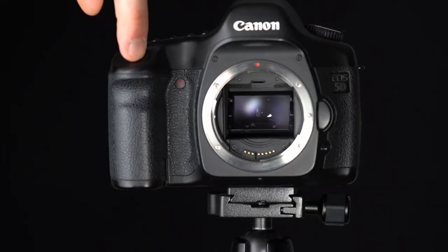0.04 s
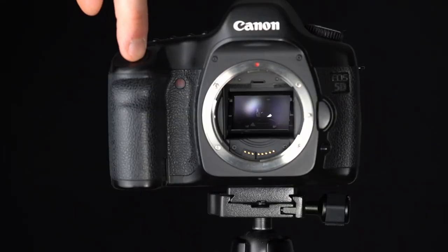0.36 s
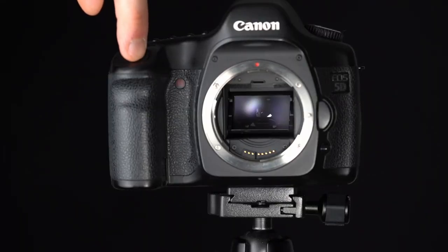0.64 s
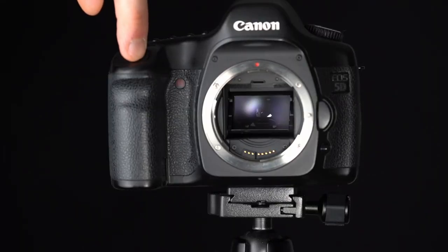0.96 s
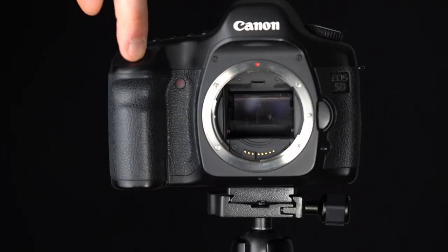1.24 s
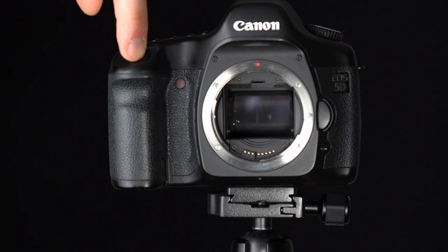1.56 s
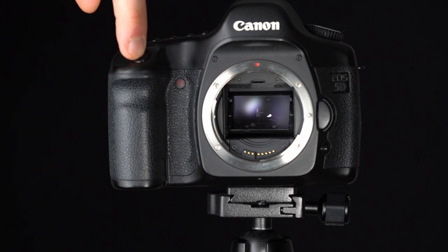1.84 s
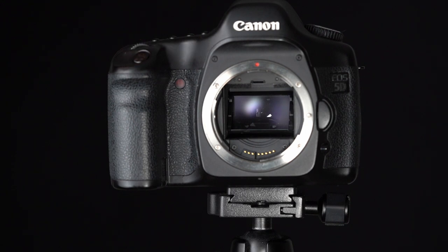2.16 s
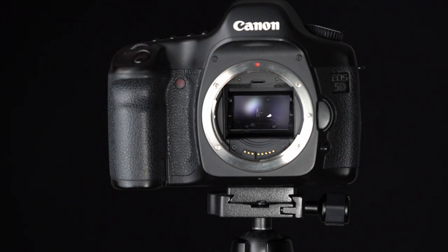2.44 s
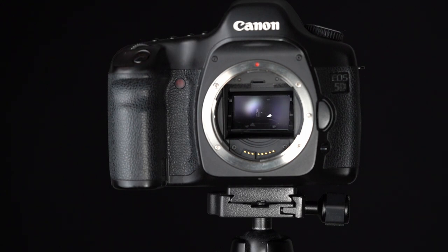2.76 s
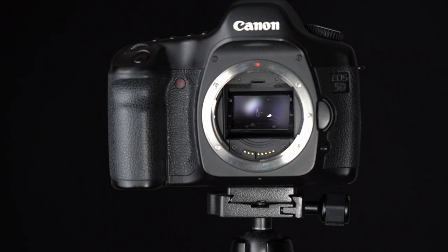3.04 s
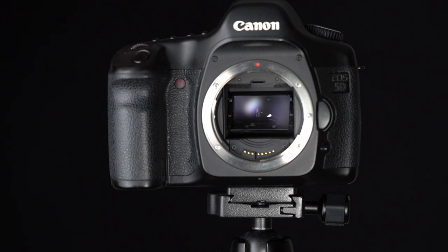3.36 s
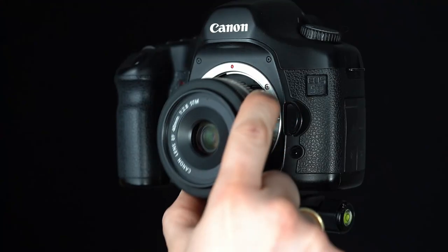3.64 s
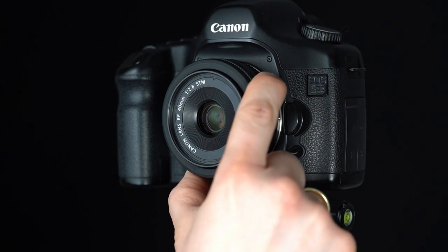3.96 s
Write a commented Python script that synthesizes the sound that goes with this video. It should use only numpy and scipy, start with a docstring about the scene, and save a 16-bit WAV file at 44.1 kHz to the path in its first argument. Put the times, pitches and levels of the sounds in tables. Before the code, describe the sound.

Close to the microphone, a camera shutter fires a steady burst of crisp, rattling clacks that ring through the room over a low throb. Only faint hum remains, until a lens is attached with a soft knock, scrape and click.

```python
"""Crisp clacks, three a second, ring through a reverberant room: a reflex camera is already mid-burst.
In each frame the mirror is released and hits its stop, the shutter curtains zing and stop, the mirror
slaps back and rattles, and a latch ticks; the body rings and the tripod sways with a low throb.
After a pause with only mains hum and faint air, a lens knocks onto the mount, scrapes round and seats.
Every click is a burst of micro-impacts, coloured by the part that is hit."""
import sys
import numpy as np
from scipy import signal
from scipy.fft import rfft, irfft, next_fast_len
from scipy.io import wavfile
from scipy.ndimage import uniform_filter1d, minimum_filter1d

SR = 44100
rng = np.random.default_rng(int(sys.argv[2]) if len(sys.argv) > 2 else 0)


def inscribe(sig):
    """Save sig as 16-bit PCM at rate SR to the path in sys.argv[1].

    A 1-D sig is mono; a 2-D sig holds one channel per row.
    Samples are clipped to [-1, 1] before scaling.
    """
    pcm = np.round(np.clip(np.atleast_2d(sig).T, -1, 1) * 32767)
    wavfile.write(sys.argv[1], SR, pcm.astype(np.int16))


N = 176400


def amp(db):
    """Decibels to gain."""
    return 10 ** (np.asarray(db) / 20)


def unit(x):
    """Scale to rms 1."""
    return x / np.sqrt(np.mean(x ** 2) + 1e-20)


def along(points, hz):
    """Read a curve of (frequency, value) points on a log axis."""
    f, v = np.transpose(points)
    return np.interp(np.log(hz + 1), np.log(f + 1), v)


def add(track, s, sound):
    """Mix a sound into the track at s seconds."""
    start = round(s * SR)
    sound = sound[max(-start, 0):max(len(track) - start, 0)]
    track[max(start, 0):][:len(sound)] += sound


def noise(size=8192):
    """White noise."""
    return rng.standard_normal(size)


def coloured(x, eq):
    """Shape a signal with an EQ curve, at rms 1."""
    hz = np.fft.rfftfreq(len(x), 1 / SR)
    return unit(irfft(rfft(x) * amp(along(eq, hz)), len(x)))


def swell(t, attack, t60):
    """Envelope: rounded attack, exponential decay."""
    return (1 - np.exp(-t / max(attack, 1e-5))) * amp(-60 * t / t60)


def contact(grain, eq, db, attack, t60):
    """One hit: a burst of micro-impacts rings with the colour of its part; db sets its energy."""
    n = len(grain)
    burst = rfft(grain * swell(np.arange(n) / SR, attack, t60))
    hz = np.fft.rfftfreq(n, 1 / SR)
    grain_colour = np.sqrt(abs(uniform_filter1d(abs(burst) ** 2, size=36)) + 1e-12)
    low_cut = (hz + 1) / (hz + 150)
    gain = amp(along(eq, hz)) * low_cut / grain_colour
    # minimum phase keeps the attack sharp: all ringing follows the hit
    cepstrum = irfft(np.log(gain + 1e-9))
    cepstrum[1:n // 2] *= 2
    cepstrum[n // 2 + 1:] = 0
    hit = irfft(burst * np.exp(rfft(cepstrum)))
    return amp(db) * np.sqrt(SR / n) * unit(hit)


def ringing(x, modes):
    """A blow as it leaves a solid part: the blow itself plus the part's ringing modes."""
    t = np.arange(SR // 2) / SR
    ring = np.zeros(len(t))
    for hz, db, t60 in modes:
        scale = 2 * np.log(1000) / (t60 * SR)  # puts the resonant peak at db
        ring += scale * amp(db - 60 * t / t60) * np.cos(2 * np.pi * hz * t)
    return x + signal.fftconvolve(x, ring)[:len(x)]


# reverb decay: f/Hz, t60/s
REVERB_DECAY = [(300, 0.72), (800, 0.57), (2000, 0.61), (3200, 0.64), (4200, 0.59), (6000, 0.57),
                (14000, 0.32)]
# reverb colour: f/Hz, level/dB
REVERB_EQ = [(250, 4.5), (800, 2.5), (1800, 4), (3100, -3.5), (3700, -2), (4400, 0), (7000, -5),
             (14000, 3.5)]
def room(x, wet_db):
    """A diffuse tail that blooms in about 10 ms and loses its treble first."""
    hz, t, spectra = signal.stft(noise(SR), SR, nperseg=256)
    tail_db = along(REVERB_EQ, hz)[:, None] - 60 * t / along(REVERB_DECAY, hz)[:, None]
    tail = signal.istft(spectra * amp(tail_db), SR, nperseg=256)[1]
    tail *= 1 - np.exp(-(np.arange(len(tail)) / SR / .01) ** 2)
    return amp(wet_db) * signal.fftconvolve(x, tail / np.linalg.norm(tail))[:len(x)]


# frame cues, each at the mirror's slap: t/s, lever knock level/dB
FRAME_CUES = [(-.0335, -47.5), (0.2968, -45.5), (0.6271, -48), (0.9574, -50), (1.2878, -52),
              (1.6186, -45.5)]
PREROLL_S = 1
def every_frame(hits, eq, vary=.65):
    """Repeat a part's hits, timed from each cue; vary mixes fresh grain into each repeat."""
    track = np.zeros(PREROLL_S * SR + N)
    for offset, db, attack, t60 in hits:
        grain = noise()
        for s, _ in FRAME_CUES:
            add(track, PREROLL_S + s + offset, contact(grain + vary * noise(), eq, db, attack, t60))
    return track


# midrange knock of the lever: f/Hz, level/dB
LEVER_EQ = [(250, -35.5), (900, -14), (1500, -1), (2200, 2), (2700, -14), (15000, -35.5)]
def lever_knock():
    """The release lever knocks 109 ms ahead of each slap, its weight changing from frame to frame."""
    track = np.zeros(PREROLL_S * SR + N)
    for s, db in FRAME_CUES:
        add(track, PREROLL_S + s - .109, contact(noise(), LEVER_EQ, db, attack=.0016, t60=.051))
    return track


# release clicks: t/s, level/dB, attack/s, t60/s
RELEASE_HITS = [(-.109, -42.5, 0.0011, .016), (-.104, -45.5, 0.0011, 0.049)]
# their bright colour: f/Hz, level/dB
RELEASE_EQ = [(150, -39), (280, -19), (700, -14), (950, 2), (1200, -11.5), (1500, -5), (2400, -5.5),
              (3600, 1.5), (4170, -4), (6000, -6.5), (8300, -4), (9560, -9), (11400, -7.5), (15500, -15.5)]
def mirror_release():
    """The mirror is let go with a double click."""
    return every_frame(RELEASE_HITS, RELEASE_EQ, vary=1.5)


# mirror on its upper stop: t/s, level/dB, attack/s, t60/s
LIFT_HITS = [(-.0857, -40.5, 0.00017, 0.0062), (-.083, -48, 0.0012, 0.086)]
# its metallic colour: f/Hz, level/dB
LIFT_EQ = [(200, -31), (350, -9), (700, -4), (980, -6), (1300, -16), (2210, -11), (2850, 4), (3190, -9.5),
           (3650, 2.5), (4350, -7.5), (5420, -2), (6100, -11), (6850, 1), (7200, -8), (7700, 1.5),
           (8700, -11), (15500, -15.5)]
def mirror_lift():
    """The rising mirror hits its stop: a hard snap with a softer tail."""
    return every_frame(LIFT_HITS, LIFT_EQ)


# curtain zing, shutter clack, curtain stop: t/s, level/dB, attack/s, t60/s
ZING_HITS = [(-.0545, -48.5, 0.0008, .018), (-.0490, -46.5, 0.0012, .016), (-.027, -50.5, .003, .03)]
CLACK_HITS = [(-.0442, -39, .0012, 0.024), (-.0395, -45, .001, 0.022), (-.036, -53.5, .004, .08)]
STOP_HITS = [(-.0172, -46.5, .0012, .009)]
# their colours, peaky, full and thin: f/Hz, level/dB
ZING_EQ = [(300, -31.5), (1900, -11.5), (2400, 5), (3100, -8.5), (4400, -12.5), (5800, -9.5), (6350, 2.5),
           (7800, -13.5), (8600, -0.5), (9500, -17.5), (15500, -13)]
CLACK_EQ = [(150, -25), (736, -8), (948, -3), (1170, -12), (1450, -2.5), (1700, -9.5), (2450, -9.5),
            (3160, -11), (3910, -7.5), (4220, -12.5), (5030, 0), (5990, -8), (6700, -2.5), (9180, -14),
            (10500, -6), (15500, -15.5)]
STOP_EQ = [(400, -26.5), (2400, 1), (2900, -13.5), (7600, -13), (8900, 3.5), (9800, -7), (15500, -6.5)]
def shutter():
    """The curtains zing across around the shutter's clack, then stop with a tick."""
    zing = every_frame(ZING_HITS, ZING_EQ)
    clack = every_frame(CLACK_HITS, CLACK_EQ)
    return zing + clack + every_frame(STOP_HITS, STOP_EQ)


# the mirror's slap and rattle: t/s, level/dB, attack/s, t60/s
SLAP_HITS = [(0, -29.5, .001, .007), (.005, -42, 0.0015, 0.02)]
RATTLE_HITS = [(.020, -38, .002, 0.026), (.0232, -42.5, .001, 0.014), (.031, -49, .001, .03)]
# their hard, bright colours: f/Hz, level/dB
SLAP_EQ = [(120, -41.5), (290, -27.5), (380, -14), (550, -7), (980, -4), (1120, -19), (1600, -12.5),
           (2000, -14.5), (2850, -2.5), (3250, -4.5), (3680, 1), (4500, -11), (5200, -3), (6000, -12),
           (6700, -3), (7600, -12.5), (11000, -9), (15500, -17.5)]
RATTLE_EQ = [(170, -43.5), (330, -17), (560, -9), (970, -0.5), (1080, -13), (1500, -6.5), (2400, -15.5),
             (2910, 0), (3190, -7.5), (3600, 0), (4000, -9), (5040, -6), (5940, -11), (6850, -5),
             (7830, -8), (13800, -13.5), (15500, -20.5)]
def mirror_return():
    """The mirror slaps back, the main accent of each frame, and rattles to rest."""
    return every_frame(SLAP_HITS, SLAP_EQ) + every_frame(RATTLE_HITS, RATTLE_EQ)


# latch tick: t/s, level/dB, attack/s, t60/s
LATCH_HITS = [(.130, -50, 0.0027, .045)]
# its broad midrange: f/Hz, level/dB
LATCH_EQ = [(250, -17.5), (600, -16.5), (1000, 2), (1300, -1), (4000, -2.5), (15000, -20.5)]
def latch():
    """A latch closes each frame with a soft tick."""
    return every_frame(LATCH_HITS, LATCH_EQ, vary=1.5)


# ring of the body and its springs: f/Hz, level/dB, t60/s
BODY_MODES = [(564, -4, .2), (762, -2, .24), (797, -9, .22), (980, -2.5, .24), (2966, -6, .16),
              (3004, -8, 1.3), (3400, -7, .2), (3807, -11, .2), (5120, -11, .09), (6920, -7, .11)]
def camera():
    """All the hits ring through the body into the room; cutting the pre-roll opens mid-burst."""
    hits = mirror_release() + mirror_lift() + shutter() + mirror_return() + latch() + lever_knock()
    direct = ringing(hits, BODY_MODES)
    return (direct + room(direct, wet_db=-8))[PREROLL_S * SR:]


def tripod():
    """The mirror's lift and slap, and the push of the hand, set the stand swaying."""
    track, t = np.zeros(N), np.arange(SR) / SR

    def sway(hz, db, attack, t60):
        return amp(db) * swell(t, attack, t60) * np.sin(2 * np.pi * hz * t)

    for s, _ in FRAME_CUES:
        add(track, s - .086, sway(hz=80, db=-42.5, attack=.025, t60=.28))  # lift
        add(track, s + .013, sway(hz=49, db=-29.5, attack=.15, t60=.8))  # slap
    add(track, 3.89, sway(hz=47, db=-35.5, attack=.012, t60=.7))  # hand
    return track


# dark bed of room air: f/Hz, level/dB
AIR_EQ = [(20, -4), (100, -1.5), (160, -10), (300, 0), (400, -7), (590, -1.5), (760, -13.5), (2000, -20),
          (15500, -32)]
HUM_HZ, HUM_DB, HUM_DROP_S, HUM_DROP_DB, AIR_DB = 50, -51.5, 3.43, -6.5, -62
def hum_and_air():
    """Faint room air and a mains hum that steps down before the lens arrives."""
    t = np.arange(N) / SR
    drop = np.clip((t - HUM_DROP_S) / .0045, 0, 1)
    hum = amp(HUM_DB + HUM_DROP_DB * drop) * np.sqrt(2) * np.sin(2 * np.pi * HUM_HZ * t)
    return hum + amp(AIR_DB) * coloured(noise(N), AIR_EQ)


# the bayonet knocks, catches and seats: t/s, level/dB, attack/s, t60/s
KNOCK_HITS = [(3.735, -68, .0005, 0.05), (3.7437, -52.5, 0.0002, 0.013), (3.7496, -49.5, 0.00014, 0.035),
              (3.7657, -56.5, 0.0003, 0.018)]
CATCH_HITS = [(3.7759, -50.5, 0.00017, 0.022)]
SEAT_HITS = [(3.8408, -53, 0.00017, .022), (3.8475, -49.5, .002, 0.056), (3.8523, -50, 0.00042, 0.011)]
# their hollow colours: f/Hz, level/dB
KNOCK_EQ = [(150, -53), (250, -14), (398, -15.5), (516, -2.5), (705, -6), (961, 0), (1300, -6.5),
            (1850, -9), (3110, -7.5), (4470, -19), (10800, -32), (15500, -40)]
CATCH_EQ = [(250, -23), (1000, 5), (1400, -2), (1950, -25), (2450, 1), (3000, -12), (4200, -5),
            (5400, -14.5), (15500, -32)]
SEAT_EQ = [(150, -36), (280, -14), (540, -3.5), (1000, 1), (1350, -5.5), (1850, -15), (2400, -11),
           (3500, -9), (4320, -5.5), (6200, -13), (9400, -22), (10800, -19.5), (15500, -34)]
def bayonet_clicks():
    """The lens knocks on the mount, catches and clicks home."""
    track = np.zeros(N)
    for hits, eq in [(KNOCK_HITS, KNOCK_EQ), (CATCH_HITS, CATCH_EQ), (SEAT_HITS, SEAT_EQ)]:
        for s, db, attack, t60 in hits:
            add(track, s, contact(noise(), eq, db, attack, t60))
    return track


# low handling rumble: f/Hz, level/dB
HAND_EQ = [(20, -14), (65, 0), (120, -15), (600, -70)]
def hand_rumble():
    """The hand rumbles on the body, fading in from the lens's first knock."""
    fade_in = np.interp(np.arange(N) / SR, [KNOCK_HITS[0][0], 3.89], [0, 1])
    return amp(-57) * fade_in * coloured(noise(N), HAND_EQ)


# rasp of the mount: f/Hz, level/dB
SCRAPE_EQ = [(150, -40.5), (300, -16), (950, -9), (1550, -1), (1900, -18), (3000, -9), (4600, -4),
             (5600, -12.5), (15500, -30)]
SCRAPE_START_S, SCRAPE_END_S, SCRAPE_DB, GRIT_DB = 3.788, 3.836, -37.5, 4
def bayonet_scrape():
    """The turning lens scrapes in tiny, uneven slips."""
    t = np.arange(N) / SR
    roughness = unit(uniform_filter1d(noise(N), size=50))
    slips = amp(GRIT_DB * roughness) * noise(N)
    turn = np.clip(np.minimum(t - SCRAPE_START_S, SCRAPE_END_S - t) / .01, 0, 1)
    return amp(SCRAPE_DB) * turn * coloured(slips, SCRAPE_EQ)


# short ring of the lens barrel: f/Hz, level/dB, t60/s
BARREL_MODES = [(545, 0, .04), (980, 2, 0.03), (1270, -3, .03), (4680, -9, 0.044)]
def lens():
    """Clicks and scrape ring the barrel and the room, over the rumble of the hand."""
    mount = bayonet_clicks() + bayonet_scrape()
    return ringing(mount, BARREL_MODES) + room(mount, wet_db=-5) + hand_rumble()


def scene():
    """All sources at one close microphone."""
    return (camera() + lens() + tripod() + hum_and_air())[None]


LIMITER_S, TOP_HZ = .001, 16400
def record(dry):
    """A fast limiter holds peaks to full scale; a steep high cut follows."""
    span = round(LIMITER_S * SR)
    needed_gain = 1 / np.maximum(abs(dry), 1)
    limited = dry * uniform_filter1d(minimum_filter1d(needed_gain, span), span)
    size = next_fast_len(N + SR // 2)
    edge = np.clip((TOP_HZ - np.fft.rfftfreq(size, 1 / SR)) / 700, 0, 1)  # 700 Hz wide
    high_cut = np.sin(np.pi / 2 * edge) ** 2
    return irfft(rfft(limited, size) * high_cut, size)[..., :N]


dry = scene()
out = record(dry)
inscribe(out)
```